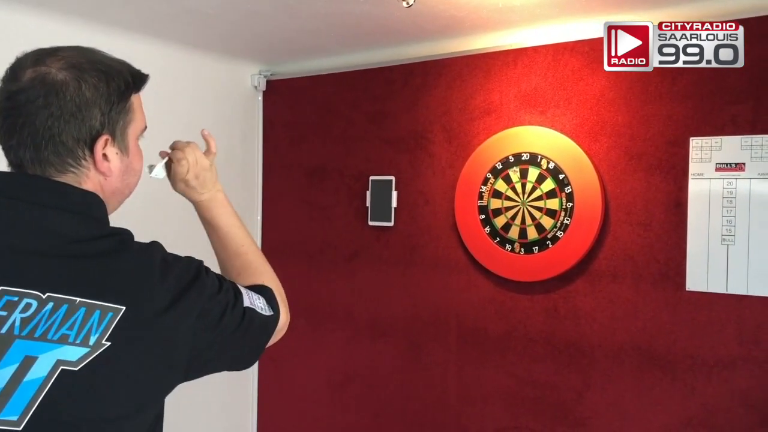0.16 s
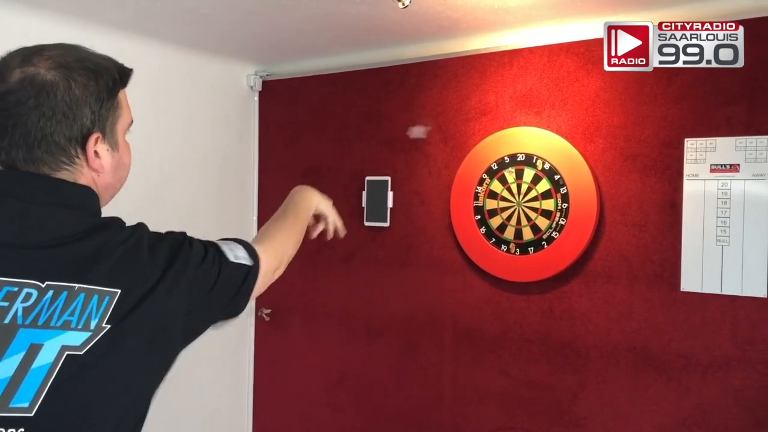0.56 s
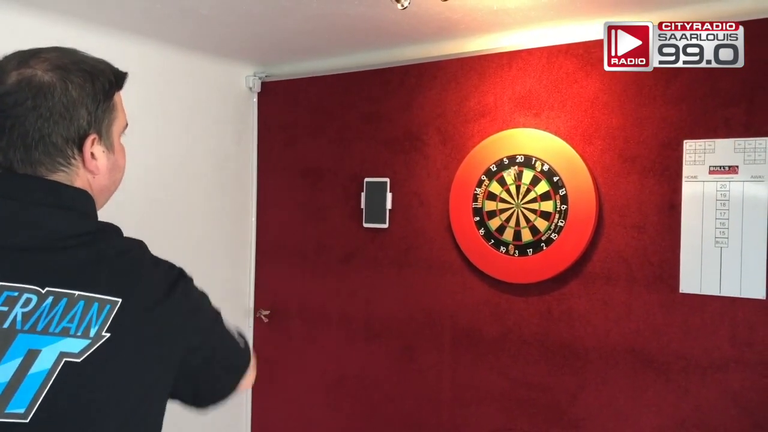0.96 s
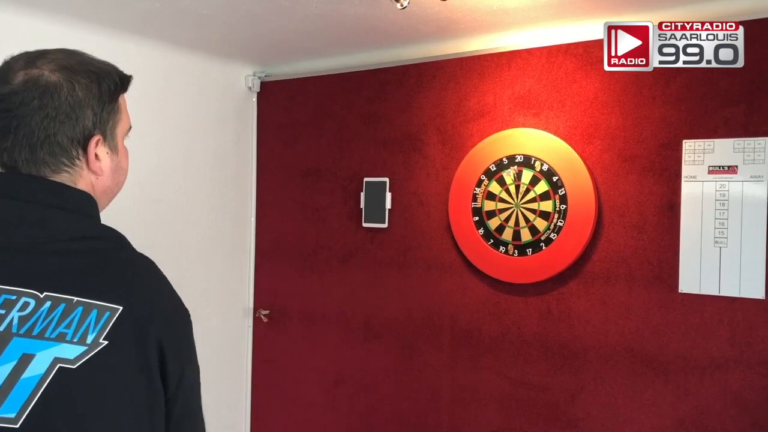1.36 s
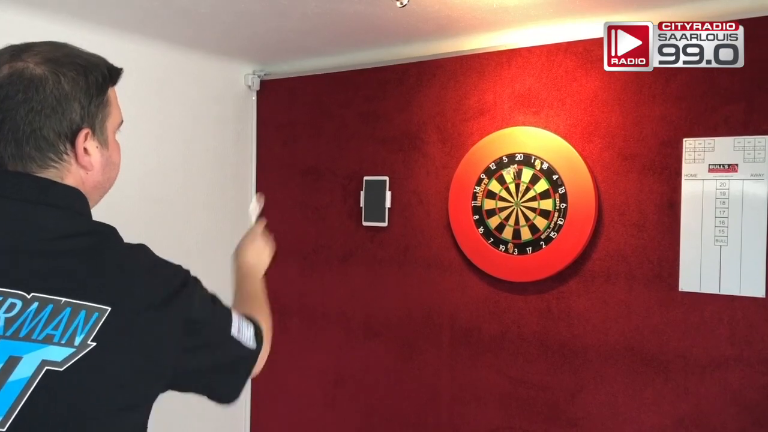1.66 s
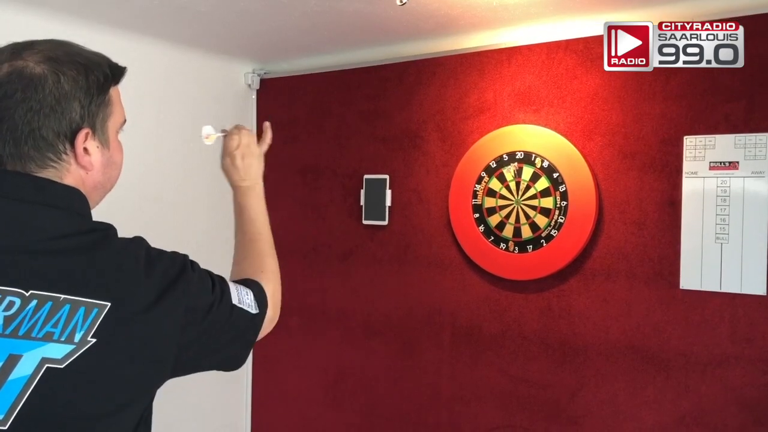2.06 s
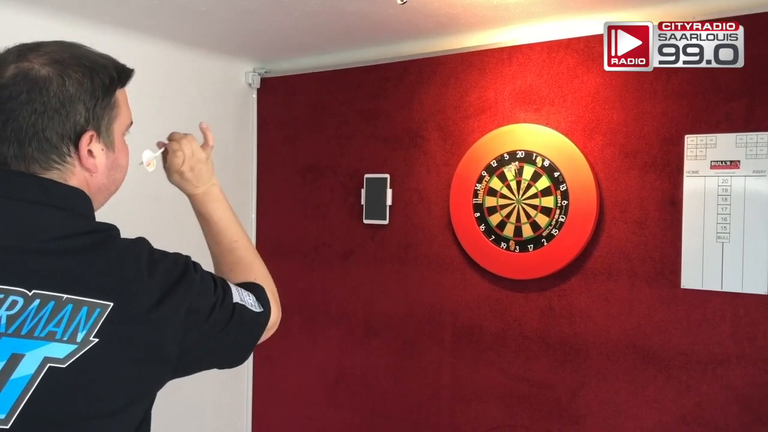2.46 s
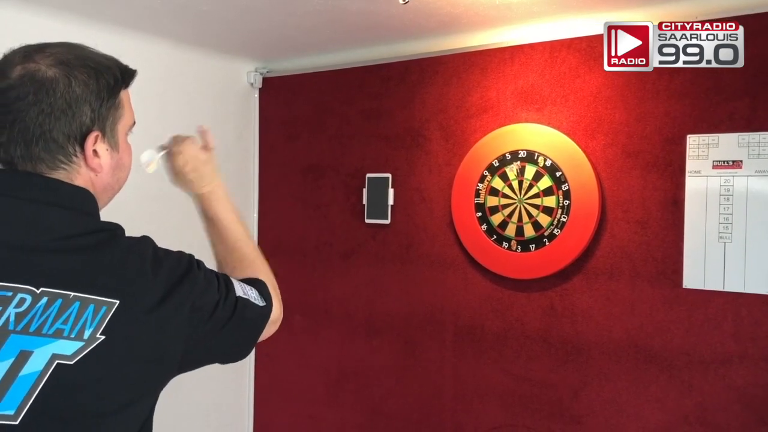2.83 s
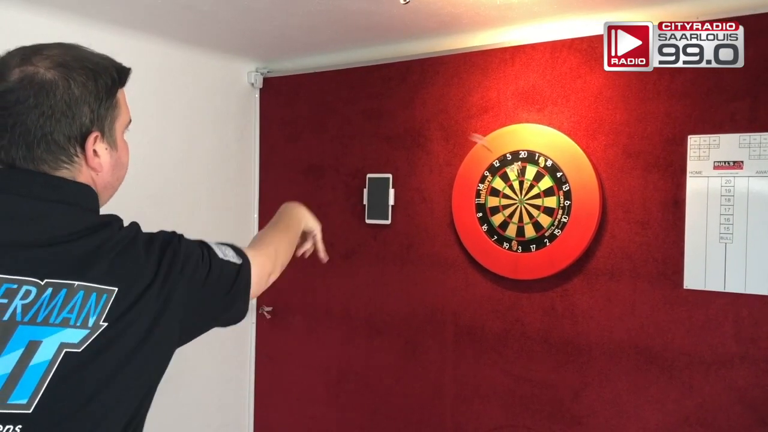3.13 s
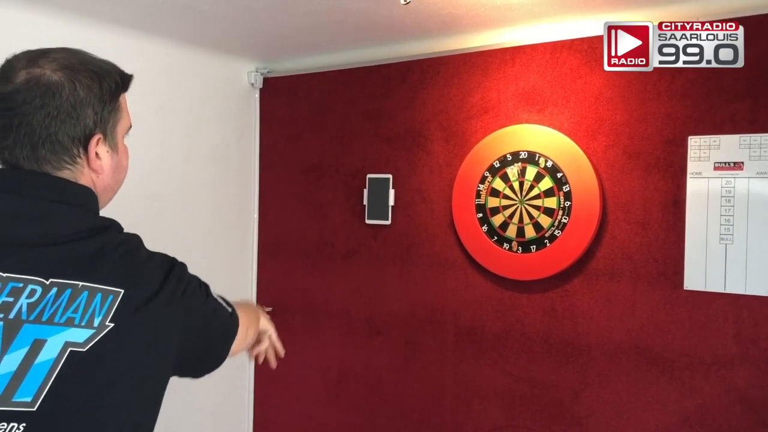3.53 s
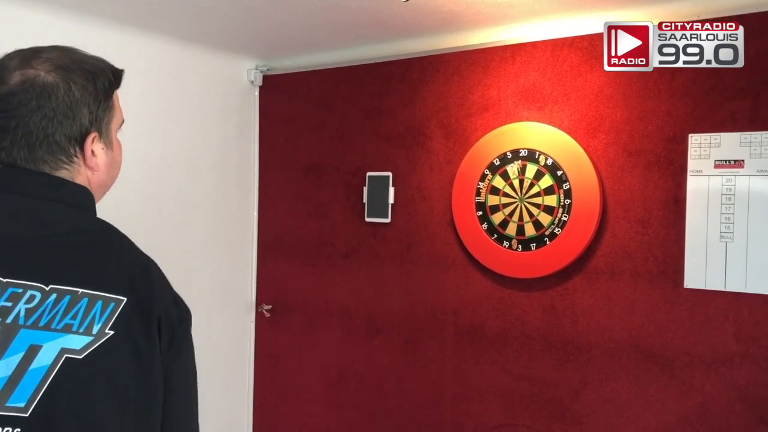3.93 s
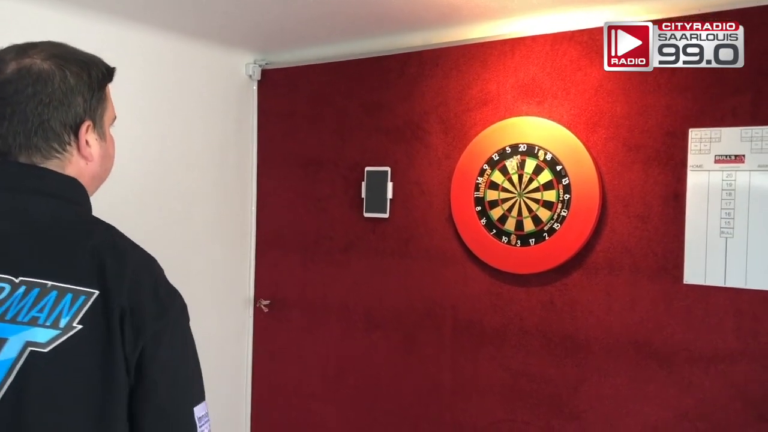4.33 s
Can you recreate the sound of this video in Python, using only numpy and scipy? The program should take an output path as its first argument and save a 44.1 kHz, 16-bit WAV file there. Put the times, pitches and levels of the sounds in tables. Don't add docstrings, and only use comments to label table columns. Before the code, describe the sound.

Two dart hits, heard by a phone a few metres away. Each begins with a brief cloth whip, a short gap, then bright steel scrapes and a compact hollow knock from board and wall, with a short room echo. The second is brighter and snappier. Afterwards clothing rubs softly, while low outside rumble dies away and briefly swells near the end.

```python
import sys
import numpy as np
from scipy import signal
from scipy.io import wavfile
from scipy.ndimage import uniform_filter1d

SR = 44100
rng = np.random.default_rng(int(sys.argv[2]) if len(sys.argv) > 2 else 0)


def gain_from_db(level_db):
    decades = np.asarray(level_db, float) / 20
    return 10 ** decades


def master(y):
    cut = np.clip(np.atleast_2d(y).T, -1, 1)
    pcm = np.round(cut * 32767)
    wavfile.write(sys.argv[1], SR, pcm.astype(np.int16))


N = 197964
T = np.arange(N) / SR

# f/Hz, level/dB per Hz
OUTSIDE_NOISE = [(18, -36), (30, -3.5), (71, -21), (102, -3.5), (134, -9.5), (247, 2), (350, -25),
                 (388, -11.5), (794, -17), (1170, -10.5), (2500, -38), (2710, -45.5), (4000, -44.5),
                 (5200, -60), (8800, -120)]
# f/Hz, width/Hz, level/dB
ENGINE_HUMS = [(47, 4.6, -11), (104, 41, -7), (194.4, 5.2, -7.5), (249, 31, -11.5), (1155, 156, -7.5),
               (2510, 110, -20.5)]
# f/Hz, level/dB per Hz
ROOM_HUSH = [(18, -29), (30, -0.5), (75, -6.5), (108, -4.5), (164, -9.5), (236, -11), (637, -12.5),
             (745, -14), (993, -20.5), (1260, -16.5), (3480, -27), (15400, -36)]
# f/Hz, level/dB per Hz
CLOTH_COLOUR = [(100, -2), (400, 0.5), (1200, -7), (2800, -1.5), (6000, -3.5), (10000, -7.5), (13000, -6.5),
                (16000, 0.5)]
# t/s, level/dB
THROWS = [
    (.588, -57),
    (3.065, -57.5),
]
# peak t/s, level/dB, rise/dB per s, fall/dB per s, brightness/dB per octave
ARM_MOVES = [
    (3.53, -66.5, 56.5, 248, -12),
    (3.832, -60, 299, 194.5, -7),
    (4.11, -66.5, 47, 33, -5.5),
    (4.48, -63, 17, 18, -3.8),
]
# t/s, level/dB, crunch length/ms, loudest ring f/Hz
CONTACTS = [(0.8037, -45.5, 3.8, 8900), (0.8082, -31.5, 1.8, 3330), (.811, -30.5, 7.7, 12500),
            (.8160, -39, 5.5, 3630), (0.8164, -36, 4, 12900), (0.8235, -28, 5, 2040),
            (.8303, -30, 1.6, 14000), (0.8324, -32.5, 2.5, 2090), (0.8472, -33.5, 4, 12800),
            (.8500, -36, 9.5, 5000), (3.2861, -39, 4, 1050), (3.2871, -41, 4.7, 2205),
            (3.2879, -38, 8.9, 12170), (3.2995, -31.5, 5.1, 12130), (3.3028, -26.5, 5.7, 2340),
            (3.3060, -19.5, 3.3, 9100), (3.3093, -29.5, 1.8, 14300), (3.3102, -27, 1.7, 2620),
            (3.3128, -25, 1.9, 9900), (3.321, -33.5, 4.7, 7500), (3.3290, -33.5, 4.1, 3260)]
# f/Hz, width/Hz, level/dB
DART_RINGS = [(1234, 700, -2), (2080, 330, 4.5), (2520, 160, 2), (3470, 1200, -7.5), (4850, 900, 7),
              (6130, 2300, -4), (9900, 1300, 2), (12500, 2000, -4), (15900, 3100, 3)]
# t/s, level/dB, push length/ms
THUMPS = [
    (0.81, -41, 0.66),
    (0.8345, -31.5, 0.42),
    (.8370, -20, 0.96),
    (.8560, -25.5, 0.74),
    (3.2860, -38.5, 0.23),
    (3.3050, -24.5, 0.31),
    (3.3134, -21, 1.11),
    (3.3322, -28.5, 1.38),
]
# f/Hz, level/dB, time to fall 60 dB/s
PANEL_MODES = [(61.8, -22, 0.7), (85.7, -25.5, 0.33), (107.6, -19.5, 0.45), (123.4, -14, 0.48),
               (147.2, -14.5, 0.44), (179.8, -19, 1), (200.6, -13, 0.45), (259.1, -2, 0.15),
               (271.4, -7.5, 0.27), (305.9, -14, 0.56)]
# f/Hz, level/dB, time to fall 60 dB/s
BOARD_MODES = [(330.5, -6, 0.263), (360.3, -8.5, .5), (374, -9.5, 0.5), (401.7, -13, 0.97),
               (512.4, -2.5, 0.25), (522.6, -13.5, 0.28), (552.5, -3.5, 0.46), (620, -28, 0.36),
               (703, -24, 0.22), (692, -17.5, 0.22), (763, 4.5, 0.14), (797, -12, 0.18), (960, -18.5, 0.26)]
# f/Hz, time to fall 60 dB/s
ROOM_T60 = [(60, 1), (250, 0.56), (700, 0.44), (2000, 0.36), (5000, 0.35), (10000, 0.16), (16000, 0.061)]


def level(x, db):
    return x * gain_from_db(db) / np.sqrt(np.mean(x ** 2))


def on_log(table, hz):
    f, value = np.transpose(table)
    return np.interp(np.log(np.maximum(hz, 1)), np.log(f), value)


def band(x, hz, width):
    return signal.lfilter(*signal.iirpeak(min(hz, .45 * SR), hz / width, fs=SR), x)


def walk(rate):
    gap = int(SR / rate)
    knots = rng.standard_normal(N // gap + 2)
    slow = uniform_filter1d(np.interp(T * SR / gap, np.arange(len(knots)), knots), gap)
    return slow / slow.std()


def air(spectrum, flicker_db, tilt_db=0., grit=1.):
    centres = 43 * 2 ** np.arange(0, 9, .5)
    weights = gain_from_db(on_log(spectrum, centres)) * np.sqrt(centres)
    weights = weights / np.linalg.norm(weights)
    out = 0
    for hz, weight in zip(centres, weights):
        noise = grit * rng.standard_normal(N)
        noise = band(band(noise, hz, hz / 2), hz, hz / 2)
        gain_db = flicker_db * walk(7.5) + tilt_db * np.log2(max(hz, 1800) / 4000)
        out = out + weight * level(noise, 0) * gain_from_db(gain_db)
    return out


def tent(s, db, rise_db_s, fall_db_s):
    return gain_from_db(db - np.where(T < s, rise_db_s * (s - T), fall_db_s * (T - s)))


def rumble():
    hums = sum(level(band(rng.standard_normal(N), hz, width), db) for hz, width, db in ENGINE_HUMS)
    drone = air(OUTSIDE_NOISE, 1.2)
    leaving = tent(.81, -58.5, 0, 8)
    return_s, return_rise_db_s = 4.135, 95
    swell = tent(return_s, -62.5, return_rise_db_s, 140)
    stays = tent(return_s, -71.5, return_rise_db_s, 0)
    return (drone + hums) * (leaving + swell + stays) * gain_from_db(-4.5)


def hush():
    return level(air(ROOM_HUSH, .7), -69.5)


def sleeve():
    follow_lag_s, follow_db = .064, -8
    # rise and fall in dB per s, brightness in dB per octave
    whips = [(s, db, 222, 295, -3.5) for s, db in THROWS]
    drags = [(s + follow_lag_s, db + follow_db, 396, 167, -3.5) for s, db in THROWS]
    swishes = whips + drags + list(ARM_MOVES)
    power = np.array([tent(*swish[:4]) ** 2 for swish in swishes]) + 1e-30
    total = power.sum(axis=0)
    tilt_db = np.array(swishes)[:, 4] @ power / total
    grit = gain_from_db(.85 * rng.exponential(size=N))
    rub = air(CLOTH_COLOUR, .33, tilt_db, grit)
    round_s = .016
    return rub * gain_from_db(.5) * uniform_filter1d(np.sqrt(total), int(round_s * SR) + 1)


def steel(burst, hz):
    rung = sum(gain_from_db(db) * band(burst, f, width) for f, width, db in DART_RINGS)
    own = band(burst, hz, .13 * hz)
    broad = band(burst, 5000, 9000)
    rung = rung / rung.std() + own / own.std() + gain_from_db(-6.5) * broad / broad.std()
    return rung / np.linalg.norm(rung)


def crunch():
    direct, spread = np.zeros((2, N))
    t = np.arange(2048) / SR
    shape = (len(CONTACTS), len(t))
    snaps = rng.standard_normal(shape) * gain_from_db(1.2 * rng.exponential(size=shape))
    click = 1. * (t == 0)
    for (s, db, ms, hz), snap in zip(CONTACTS, snaps):
        i = int(s * SR)
        gain = gain_from_db(db) * np.sqrt(ms * SR / 2000)
        direct[i:i + len(t)] += gain * steel(snap * np.exp(-t * 1000 / ms), hz)
        spread[i:i + len(t)] += gain * steel(click, hz)
    return direct, spread


def board():
    force = 0
    for s, db, ms in THUMPS:
        phase = np.clip((T - s) * 1000 / ms - .5, -.5, .5)
        force = force + gain_from_db(db) * np.cos(np.pi * phase) ** 2
    knock = band(band(force, 490, 406), 483, 2400)
    ring = 0
    for hz, db, t60 in PANEL_MODES + BOARD_MODES:
        turn = 2j * np.pi * hz / SR
        pole = np.exp(turn - np.log(1000) / (t60 * SR))
        swell = np.exp(-hz / (1.3 * SR))
        feedback = np.convolve([1, -pole], [1, -swell * np.exp(turn)])
        ring = ring + gain_from_db(db) * signal.lfilter([1 - swell], feedback, force).imag
    return gain_from_db(6) * knock, gain_from_db(-39) * ring


def room():
    t = np.arange(SR) / SR
    tail = 0
    for hz in 45 * 2 ** np.arange(0, 9, .5):
        t60 = on_log(ROOM_T60, hz)
        echo = band(rng.standard_normal(SR), hz, hz / 3) * gain_from_db(-60 * t / t60)
        tail = tail + echo / np.sqrt(t60)
    gap_s, rise_s = .0062, .0024
    tail = tail * np.clip((t - gap_s) / rise_s, 0, 1)
    return tail / np.linalg.norm(tail)


def scene():
    hard, spread = crunch()
    knock, ring = board()
    dull = signal.sosfilt(signal.butter(6, 866, fs=SR, output="sos"), knock)
    sent = gain_from_db(-3) * spread + gain_from_db(-3.5) * dull + gain_from_db(-11) * ring
    walls = signal.fftconvolve(sent, room())[:N]
    return (rumble() + hush() + sleeve() + hard + knock + ring + walls)[None]


def top_cut(x):
    return signal.sosfilt(signal.butter(12, 16790, fs=SR, output="sos"), x)


def record(dry):
    no_bass = signal.sosfilt(signal.butter(4, 42, "high", fs=SR, output="sos"), dry)
    mix = signal.sosfilt(signal.ellip(8, .2, 45, 15850, fs=SR, output="sos"), no_bass)
    return top_cut(mix)


dry = scene()
out = record(dry)
master(out)
```